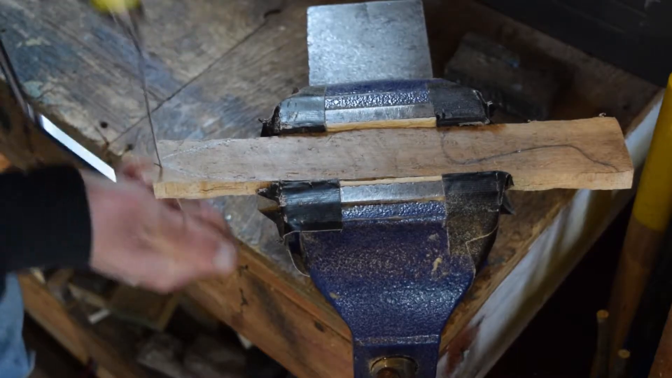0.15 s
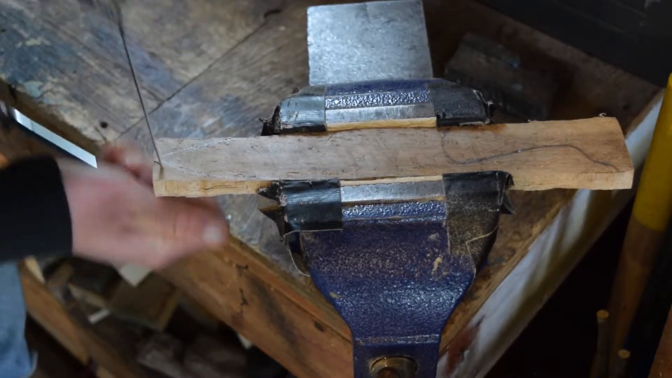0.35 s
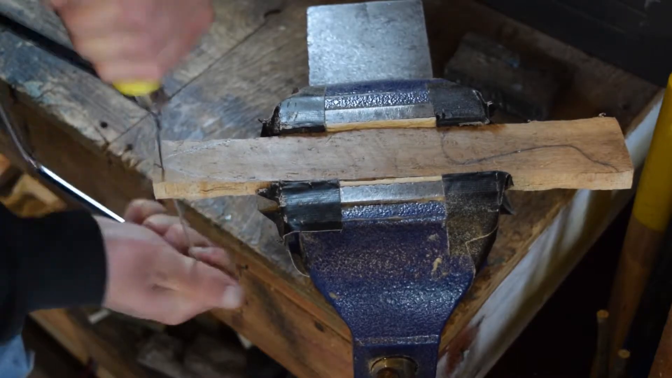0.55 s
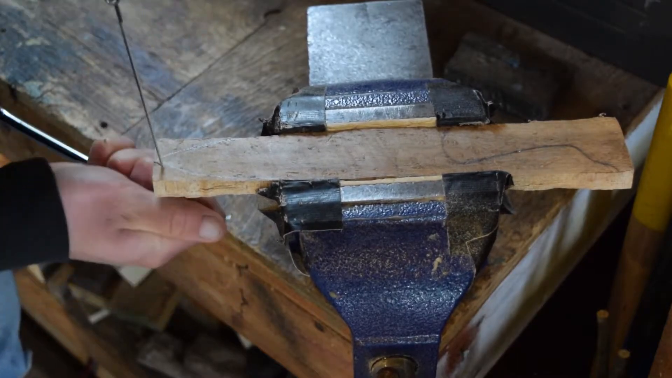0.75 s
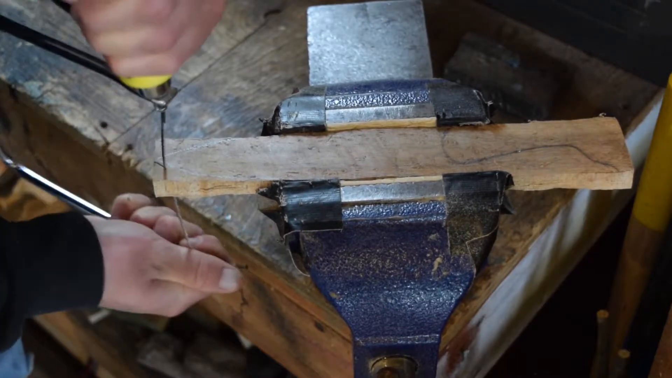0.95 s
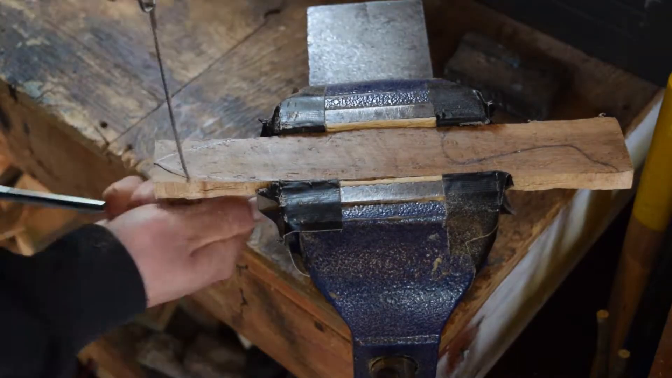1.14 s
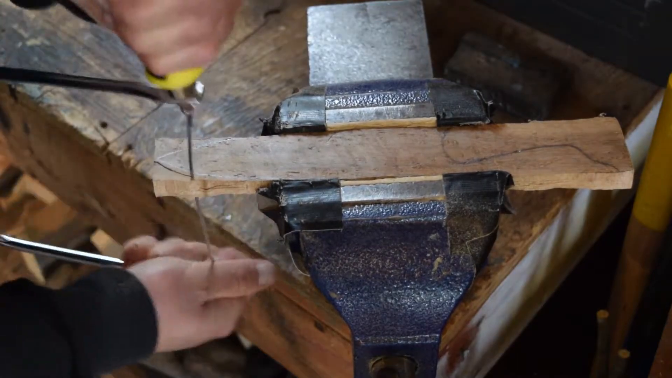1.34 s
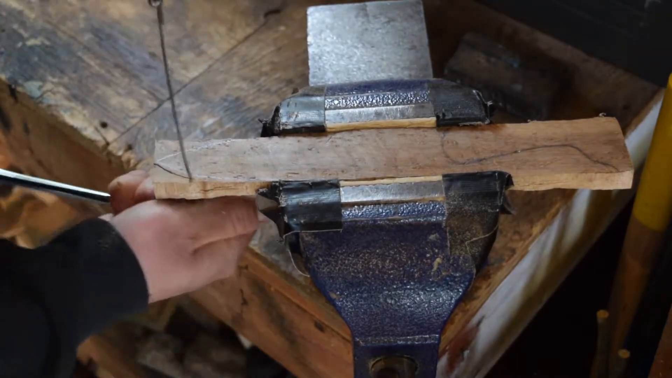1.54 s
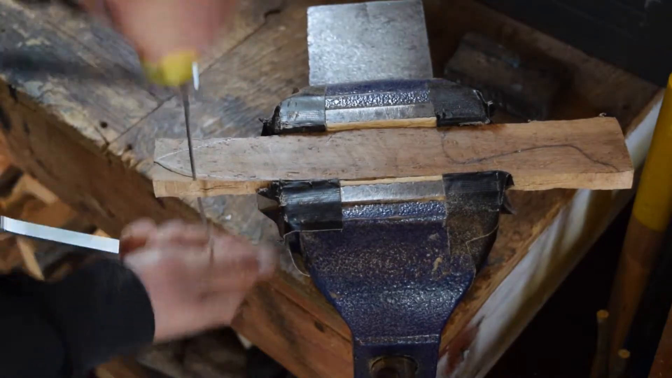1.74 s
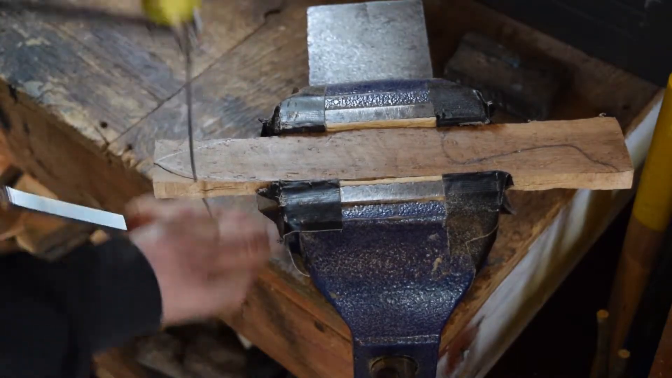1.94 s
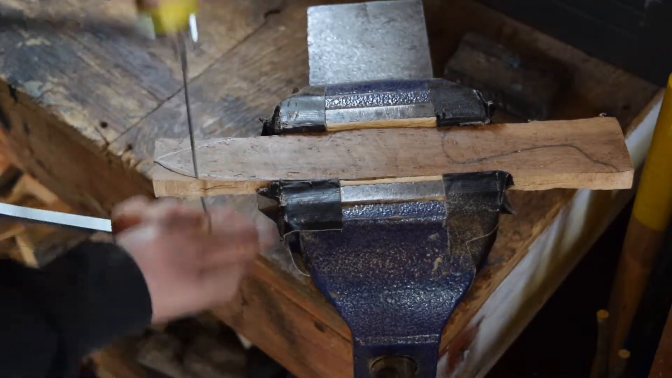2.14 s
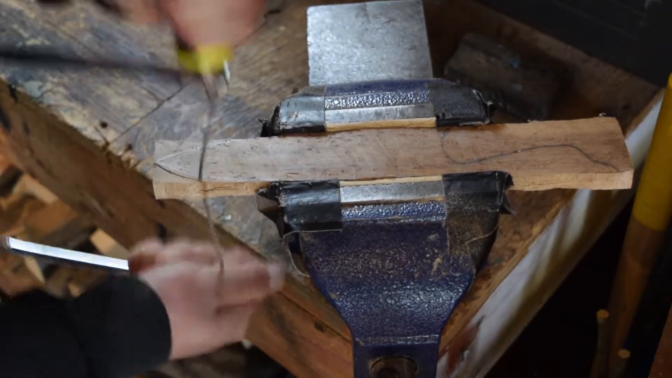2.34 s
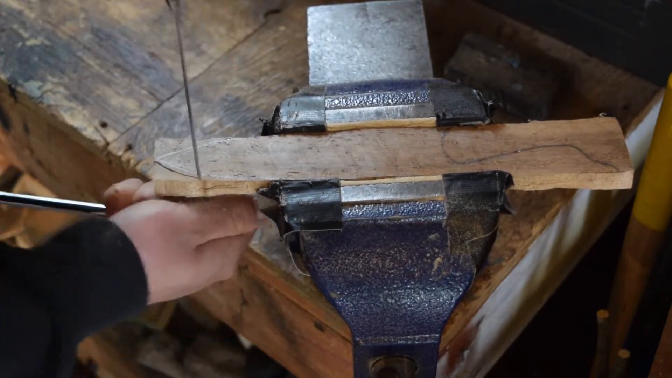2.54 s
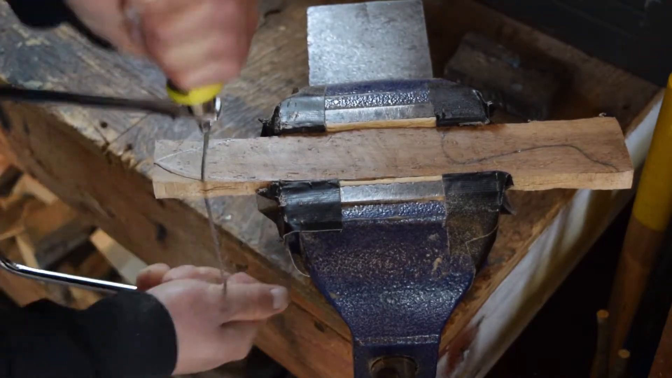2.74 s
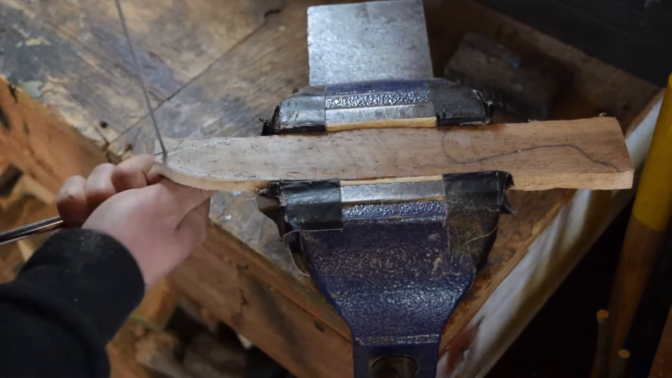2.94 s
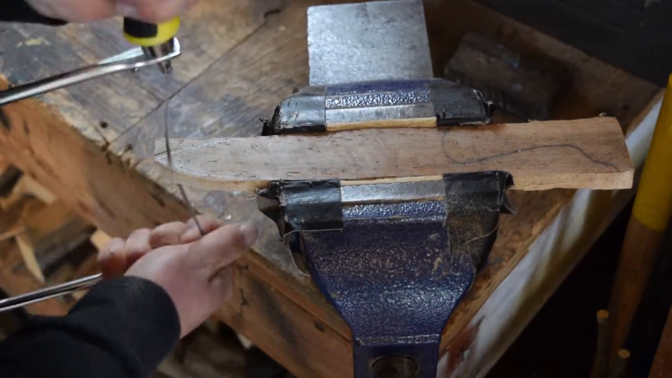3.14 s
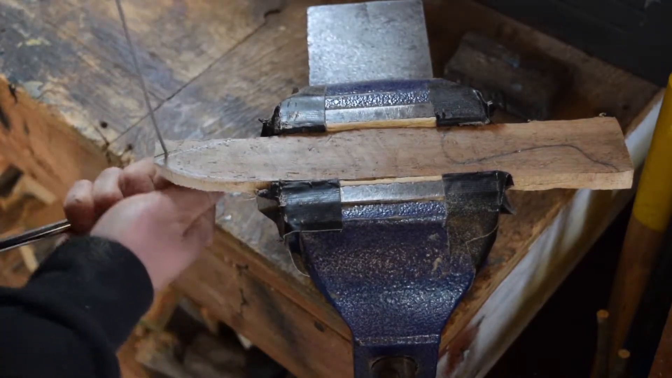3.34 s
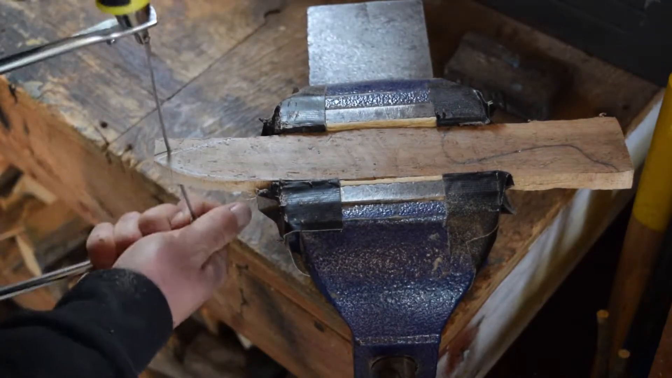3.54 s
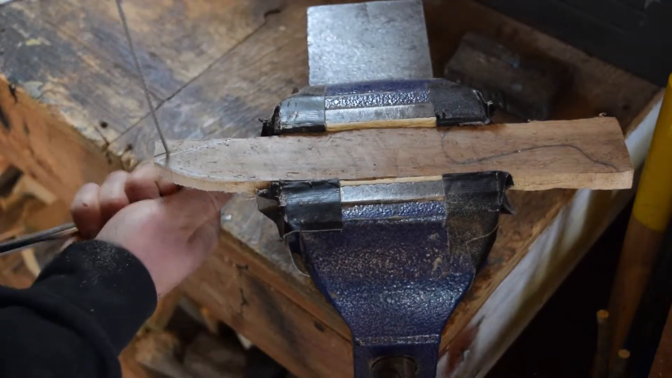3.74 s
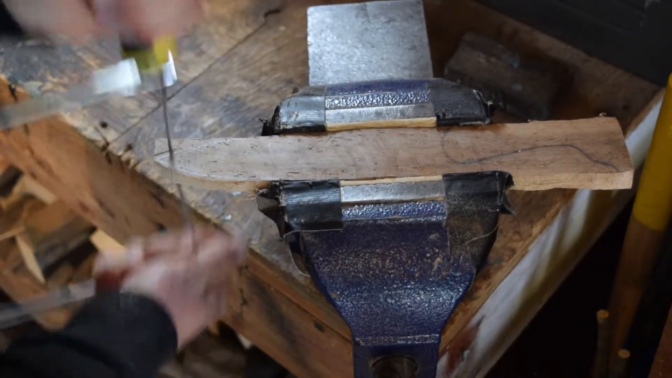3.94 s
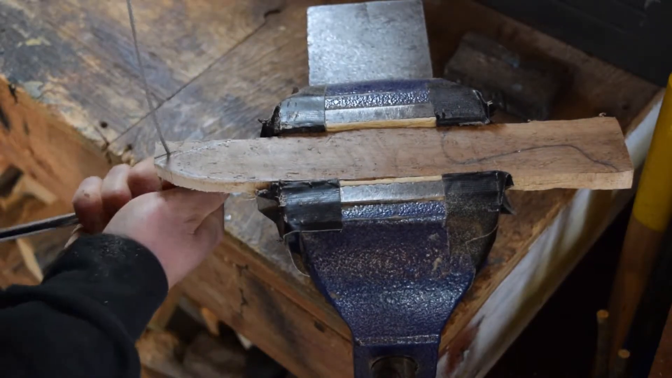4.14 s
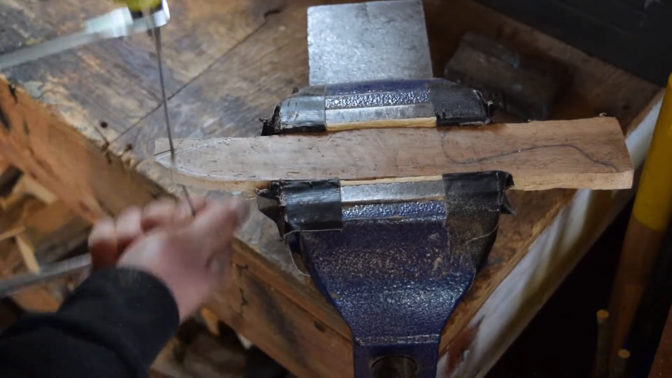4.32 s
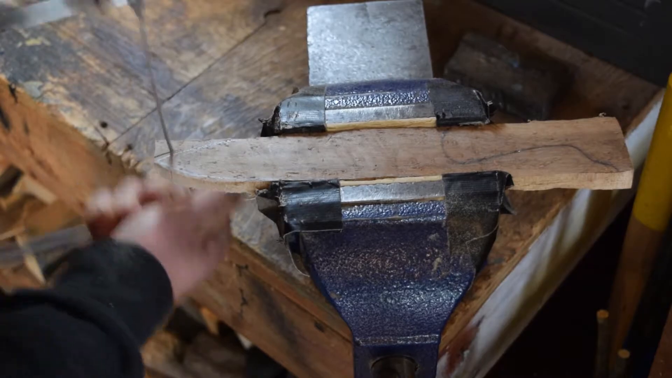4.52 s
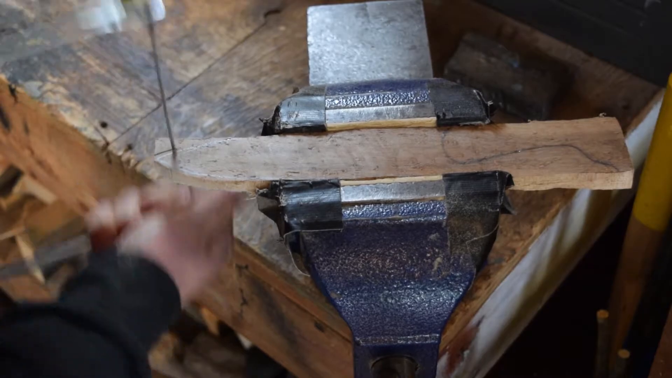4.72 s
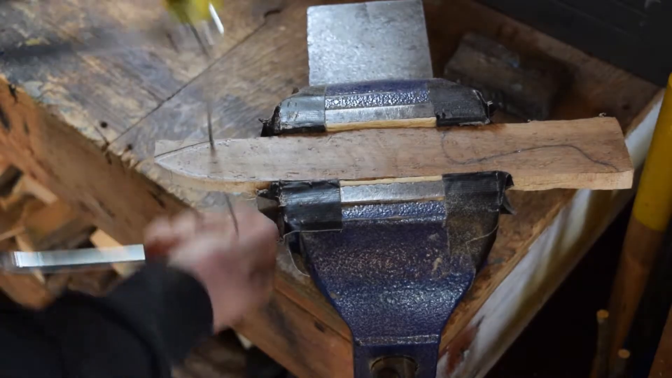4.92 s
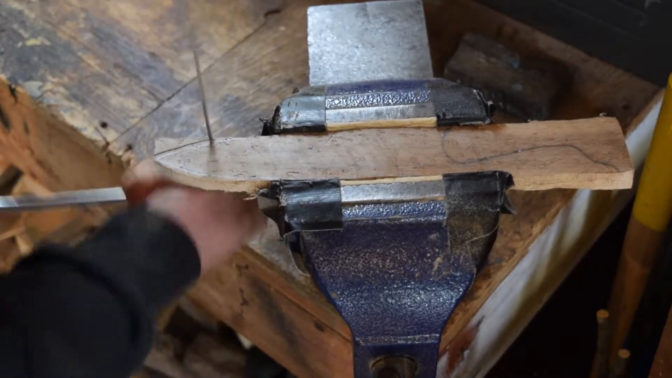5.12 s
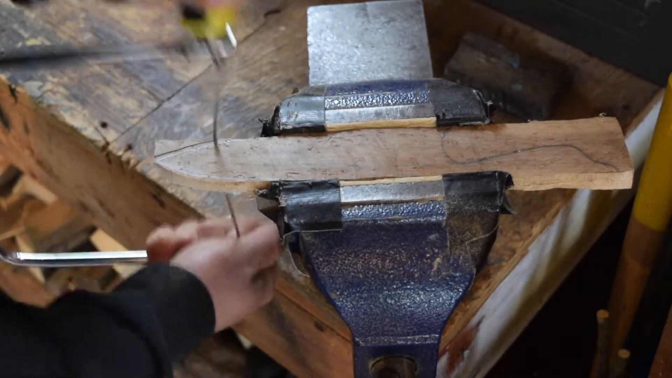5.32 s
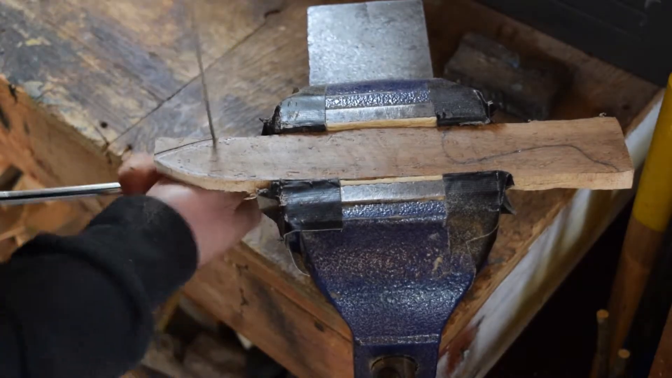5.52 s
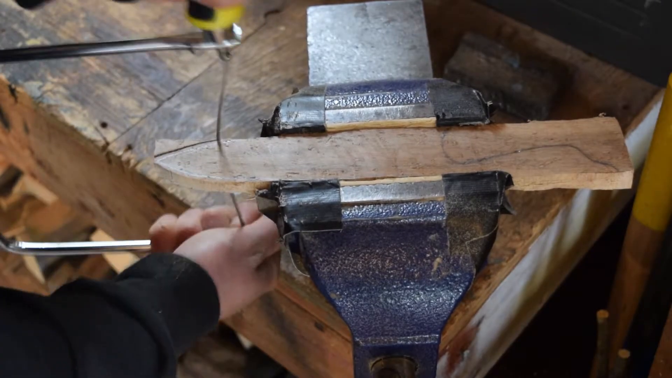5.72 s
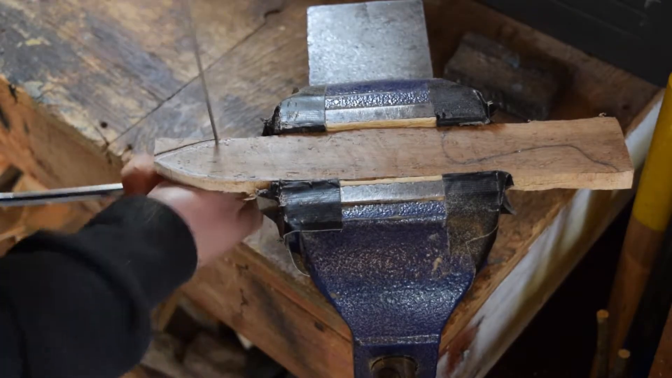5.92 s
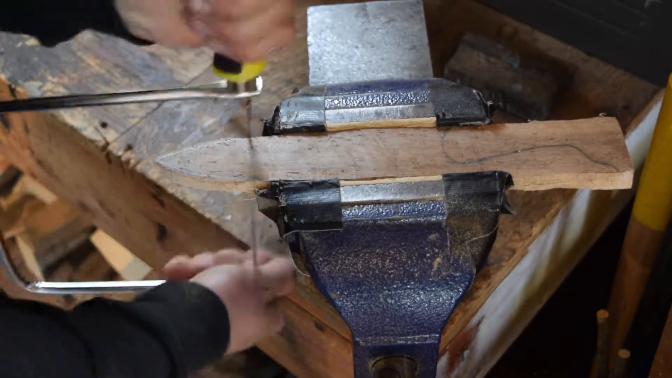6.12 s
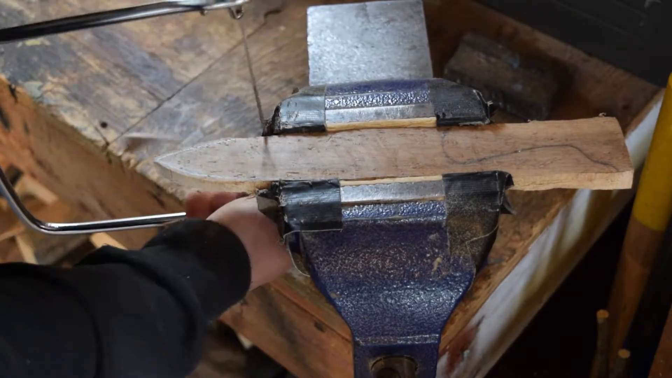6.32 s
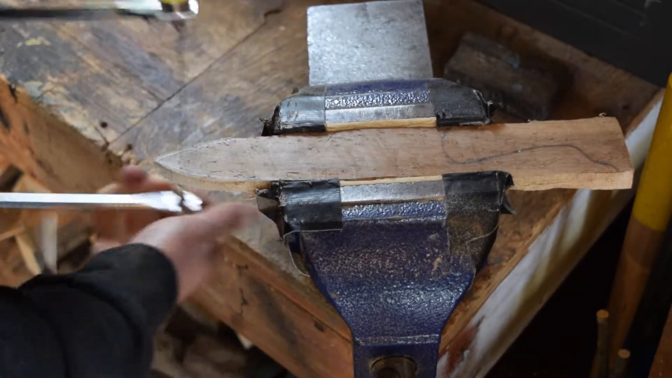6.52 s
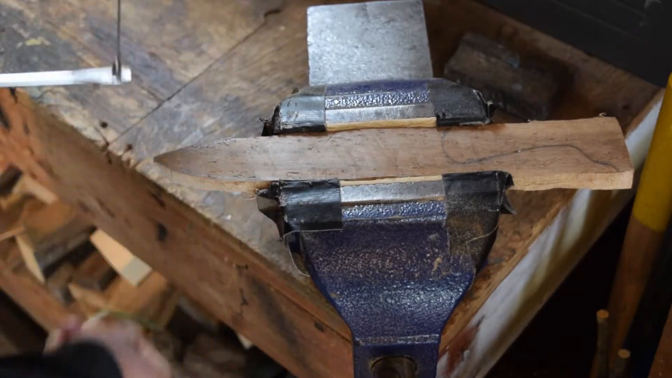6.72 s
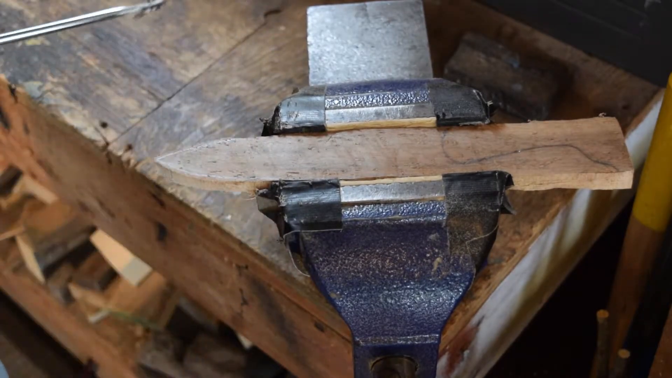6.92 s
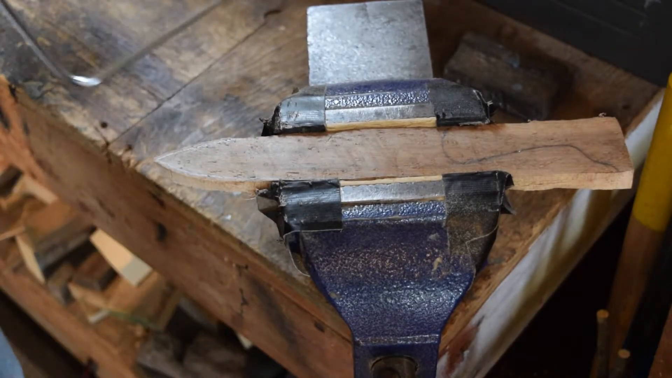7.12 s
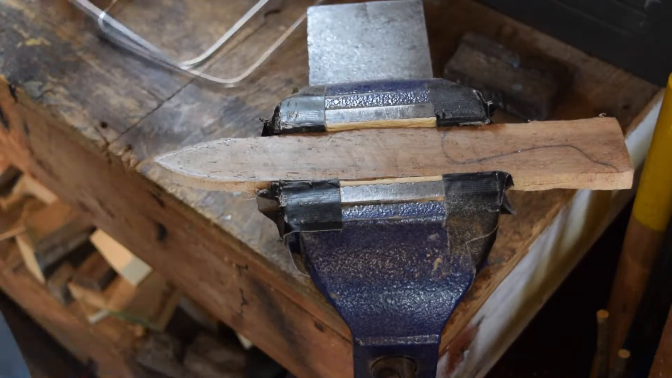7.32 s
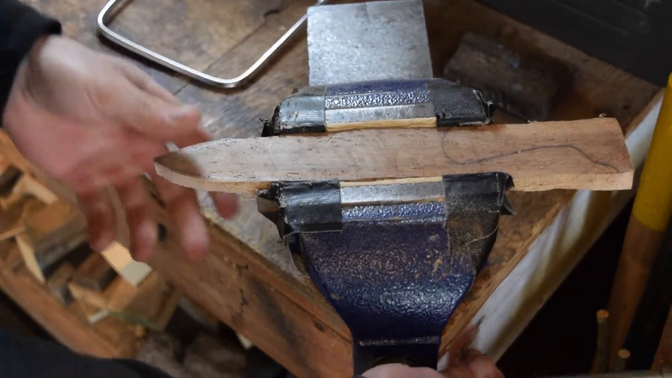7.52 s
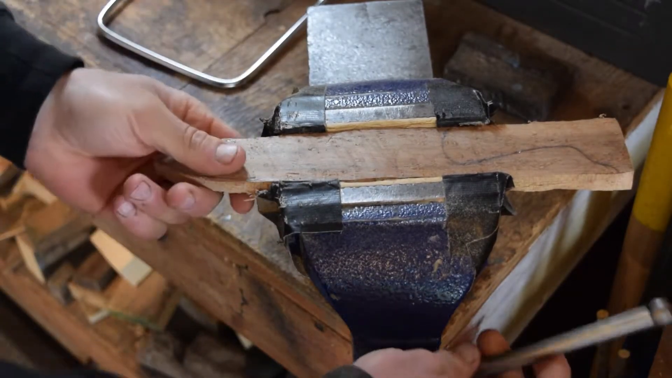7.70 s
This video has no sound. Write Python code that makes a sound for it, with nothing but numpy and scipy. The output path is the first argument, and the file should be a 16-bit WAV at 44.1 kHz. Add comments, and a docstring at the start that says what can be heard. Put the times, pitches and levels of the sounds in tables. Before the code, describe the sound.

Close, rapid back-and-forth sawing of a small wooden board, ending in a sharp crack, then light taps and dull vise knocks over grinding.

```python
"""In a small workshop a coping saw cuts the corner off a board held in a bench vise, close to the listener.
On every push and return the teeth pluck the wood: irregular impulses excite the resonances of board and saw,
tearing fibres add noise as hiss, and the bench rumbles below. The blade breaks out with a crack, an impulse
through the board's modes. Light taps follow, damped contacts; the vise is cranked open with dull knocks,
rings started by blows, over a noise-like grinding."""
import sys
import numpy as np
from scipy import signal
from scipy.fft import rfft, irfft
from scipy.io import wavfile

SR = 44100
rng = np.random.default_rng(int(sys.argv[2]) if len(sys.argv) > 2 else 0)


def master(y):
    """Save y as 16-bit WAV."""
    cut = np.clip(np.atleast_2d(y).T, -1, 1)
    pcm = np.round(cut * 32767)  # scale
    wavfile.write(sys.argv[1], SR, pcm.astype(np.int16))


N = 346626
T = np.arange(N) / SR


def amp(db):
    """Level: decibels become an amplitude ratio."""
    return 10 ** (np.asarray(db) / 20)


def unit(x):
    """Normalisation: scale to rms 1."""
    return x / np.sqrt(np.mean(x ** 2) + 1e-20)


def peak(x, db):
    """Normalisation: scale to a peak level [dB]."""
    return x * amp(db) / np.abs(x).max()


def add(out, start_s, x):
    """Superposition: mix x into out from the given time on."""
    i = int(round(start_s * SR))
    x, i = x[max(-i, 0):], max(i, 0)
    out[i:i + len(x)] += x[:max(len(out) - i, 0)]


def along(curve, s):
    """Linear interpolation: the values of a curve's columns at one moment."""
    times, *columns = np.transpose(curve)
    return [np.interp(s, times, column) for column in columns]


def band(x, lo_hz, hi_hz, order=3):
    """Band-pass filtering: keep the spectrum between two frequencies."""
    edges = [lo_hz, min(hi_hz, SR / 2 - 1000)]
    return signal.sosfilt(signal.butter(order, edges, "band", fs=SR, output="sos"), x)


def resonate(x, hz, width_hz):
    """Damped resonance: one mode, gain 1 at its centre; the narrower, the longer it rings."""
    return signal.lfilter(*signal.iirpeak(hz, hz / width_hz, fs=SR), x)


def ring(x, modes):
    """Modal superposition: a body's resonances add up, neighbours in opposite phase."""
    total = 0
    for k, (hz, width, db) in enumerate(modes):
        total = total + (-1) ** k * amp(db) * resonate(x, hz, width)
    return total


def contact(t60, grit, length_s=.4):
    """Impact excitation: a sharp push, and a noise burst of crunch that decays exponentially."""
    t = np.arange(int(length_s * SR)) / SR
    x = grit * rng.standard_normal(len(t)) * np.exp(-np.log(1000) * t / t60)
    x[0] += 1
    return x


# spectrum of the quiet workshop air: (frequency [Hz], relative spectral level [dB])
AIR_SPECTRUM = [(20, -14), (50, -0.5), (130, -6), (250, -4.5), (400, -7), (700, -8), (1200, -13.5),
                (4000, -15), (15500, -19)]
AIR_DB, HUM_DB = -64, -69  # rms levels


def air():
    """Spectrally shaped noise: faint room noise, with a narrow-band hum from a sharp resonance."""
    hz, db = np.transpose(AIR_SPECTRUM)
    f = np.arange(N // 2 + 1) * SR / N
    shape = amp(np.interp(np.log(f + 1), np.log(hz), db))
    hush = irfft(rfft(rng.standard_normal(N)) * shape, N)
    hum = resonate(resonate(rng.standard_normal(N), 296, 4.9), 296, 4.9)
    return amp(AIR_DB) * unit(hush) + amp(HUM_DB) * unit(hum)


ROOM_T60_S = .25


def room(x, gap_s=.004, treble=1.0):
    """Reverberation: dense reflections of a small, cluttered workshop, as exponentially decaying noise."""
    t = np.arange(SR // 2) / SR
    onset = np.clip(t / gap_s - 1, 0, 1)  # silence before the first reflections
    noise = rng.standard_normal(len(t)) * onset * np.exp(-np.log(1000) * t / ROOM_T60_S)
    response = band(noise, 120, 2200, order=2) + treble * band(noise, 2000, 7500, order=1)
    return signal.fftconvolve(x, unit(response) / np.sqrt(len(t)))[:N]


# resonances of the heavy bench under the vise: (frequency [Hz], width [Hz], level [dB])
BENCH_MODES = [(48, 16, -15), (83, 6.9, 0), (121.8, 26, -8.5), (181.6, 11, -5), (253, 31, -5)]


def bench(sound, follow=0.66, hold_s=0.02):
    """Forced vibration: noise follows the envelope of the work on the vise and drives the bench's modes."""
    keep = np.exp(-1 / (hold_s * SR))
    envelope = signal.lfilter([1 - keep], [1, -keep], np.abs(sound))
    force = envelope ** follow
    return unit(band(ring(force * rng.standard_normal(N), BENCH_MODES), 40, 280, order=2))


# the screw grinding in its thread: (time [s], rms level [dB])
SCREW = [(7.365, -87), (7.375, -50.5), (7.41, -52.5), (7.6, -60), (7.86, -50.5)]
# the loose vise screw knocks as it turns: (time [s], peak level [dB], ring [Hz], t60 [s])
KNOCKS = [(7.431, -24.5, 364, 0.064), (7.509, -23.5, 430, 0.02), (7.605, -25, 356.4, 0.062),
          (7.692, -23, 433, 0.027), (7.782, -27, 360, 0.037)]


def vise():
    """Friction and impact: the screw grinds, squeaks faintly and knocks, each knock with a light clack."""
    grind = amp(np.interp(T, *np.transpose(SCREW), left=-200))
    out = grind * unit(band(rng.standard_normal(N), 90, 600))
    # slow noise modulates a gliding tone
    squeak_hz = np.interp(T, [7.6, 7.72, 7.86], [6450, 6100, 6250])
    flutter = unit(band(rng.standard_normal(N), 5, 70, order=1))
    squeak = flutter * np.sin(2 * np.pi * np.cumsum(squeak_hz) / SR)
    out += amp(-75.5) * squeak * np.interp(T, [7.58, 7.63], [0, 1])
    for s, db, hz, t60 in KNOCKS:
        blow = band(contact(t60=0.077, grit=.05), 170, 780)
        width_hz = np.log(1000) / np.pi / t60
        add(out, s, peak(resonate(blow, hz, width_hz) + 0.11 * blow, db))
        clack = band(contact(t60=.04, grit=.4), 620, 1500, order=4)
        add(out, s, peak(clack, db - 17))
    return out


# light taps of the offcut and of the saw being laid down:
#   (time [s], peak level [dB], centre [Hz], width of the first of two resonances [Hz], t60 of the crunch [s])
TAPS = [(6.403, -38.5, 970, 1490, 0.051), (6.425, -51, 9000, 4000, 0.038), (6.759, -41, 900, 1100, .06),
        (6.836, -33, 2300, 1100, .004), (7.006, -38.5, 774, 600, 0.032), (7.082, -32.5, 600, 600, 0.023),
        (7.178, -40.5, 980, 1090, 0.021), (7.219, -52, 8720, 900, 0.087), (7.648, -44.5, 2440, 2500, 0.019),
        (7.799, -47, 3530, 4950, 0.013)]


def taps():
    """Damped impact: small contacts around the bench pass through two broad resonances."""
    out = np.zeros(N)
    for s, db, hz, width, t60 in TAPS:
        tap = resonate(contact(t60, grit=0.67), hz, width)
        add(out, s, peak(resonate(tap, hz, 2 * width), db))
    return out


# the board's ring as the blade breaks out: (frequency [Hz], width [Hz], level [dB])
CRACK_MODES = [(685, 80, -4), (836, 80, -12), (1173, 92, -1), (1760, 110, -6), (2010, 136, 2),
               (2560, 49, -4.5), (2620, 73.5, -2), (2940, 140, -3), (3174, 80, -3.5), (3820, 200, -4),
               (4240, 180, -11.5), (5110, 460, -12.5), (6230, 230, -18.5), (7170, 210, -13.5),
               (8570, 600, -25), (12000, 3000, -41)]
CRACK_S, CRACK_DB = 6.2385, -4.5  # time, peak level


def crack():
    """Impulsive release: the last fibres snap and the blade springs free, with a short rustling shiver."""
    out = np.zeros(N)
    snap = contact(t60=0.022, grit=0.131)
    add(snap, .0022, 2.9 * contact(t60=0.013, grit=0.31))  # a second, stronger break
    add(out, CRACK_S, peak(band(ring(snap, CRACK_MODES), 410, 16000, order=2), CRACK_DB))
    shiver = band(band(contact(t60=.16, grit=3), 500, 3600, order=1), 600, 9000, order=3)
    add(out, CRACK_S + .002, peak(shiver, -20))
    return out


def teeth(speed, rate_hz, jitter, scatter_db, tear_s, chatter_hz, chatter_db):
    """Irregular pulse train: teeth pluck in clumps as the frame chatters, and fibres tear after each."""
    passed = np.cumsum(speed) * rate_hz / SR
    chance = rng.standard_normal((400, 2))
    at = np.searchsorted(passed, np.cumsum(np.exp(jitter * chance[:, 0])))
    inside = at < len(speed)
    plucks = np.zeros(len(speed))
    plucks[at[inside]] = amp(scatter_db * chance[inside, 1])
    chatter = unit(band(rng.standard_normal(len(speed)), chatter_hz / 2, chatter_hz * 2, order=2))
    plucks *= amp(chatter_db * chatter)
    tearing = signal.lfilter([1], [1, -np.exp(-1 / (tear_s * SR))], plucks)
    return unit(plucks), unit(tearing * rng.standard_normal(len(speed)))


# mean resonances of the clamped board and the saw: (frequency [Hz], width [Hz], level [dB])
SAW_MODES = [(311.5, 28, -1.5), (363.2, 42.8, 2.5), (430.6, 65, -4.5), (511, 51, -8), (688.4, 60, -10),
             (841, 69, -13), (983, 91, -10.5), (1083, 88, -11), (1191, 83, -9.5), (1400, 123, -8.5),
             (1569, 78, -5), (1720, 96.6, -6), (1955, 95, -8.5), (2152, 37, -10), (2393, 160, -20.5),
             (3020, 250, -25.5), (3587, 340, -25.5), (4025, 260, -23), (4374, 240, -24), (5060, 250, -31),
             (6510, 240, -37), (6970, 250, -33), (7850, 76, -36), (8120, 170, -40.5), (9090, 390, -38.5),
             (9660, 68, -39), (12100, 1500, -41.5), (14000, 300, -50)]
# the blade jams for a moment: (time [s], length [s], extra board drive [dB], extra rasp drive [dB])
SNAGS = [(2.826, .006, 9, 7.5), (2.976, .035, 5.5, 8.5), (3.251, .0064, 7.5, 7), (3.446, .014, 2.5, 12),
         (4.328, .007, 6, 5)]
# hard spots in the grain, met at random: (length [s], extra board drive [dB], extra rasp drive [dB])
HARD_GRAIN = (.002, 1.5, 4)
# the rasp as the saw is steered round the curve: (time [s], level [dB], strongest ring [Hz])
RASP = [(0, 1.5, 1680), (.5, 1.5, 1560), (1.03, 2.5, 1600), (1.22, -7, 1650), (1.55, -7.5, 2350),
        (1.77, -7.5, 2400), (1.93, -3, 1400), (2.13, 1, 1420), (2.3, 2, 1750), (2.85, 3, 1620),
        (3.07, 0, 1430), (4.73, 0, 1500), (4.9, -4, 1890), (5.3, -5, 1910), (5.66, -9, 1660),
        (6.1, -6, 1750)]
# the treble along the cut:
#   (time [s], level [dB], strongest ring of the hiss [Hz], strongest ring of the sizzle [Hz])
TREBLE = [(.5, -1, 3300, 9100), (1.2, .5, 4400, 9400), (1.4, -2.5, 4100, 13200), (1.6, 2, 2500, 13100),
          (1.78, 1, 2400, 9000), (1.95, 1.5, 4800, 8800), (2.3, 5.5, 4400, 8700), (2.75, 7.5, 4600, 8600),
          (3.08, -2.5, 3000, 8750), (3.45, -4, 3000, 8700), (3.65, -1.5, 3000, 12900),
          (4.2, -4, 2600, 12800), (4.6, -1.5, 3050, 12600), (4.88, 3, 3350, 7250), (6.05, -.5, 3600, 7150)]
HISS_SHARE = .13  # of the treble's level change [dB] that reaches the hiss
# the board answers differently along the cut; its ring rises just before the corner breaks off:
#   (time [s], lowest ring [Hz], level [dB], level of the overtones [dB], mean strongest overtone [Hz])
BOARD = [(.15, 262, 0, 0, 690), (.55, 265, -1, -1, 1020), (1.05, 265, -1, 0, 1020),
         (1.25, 275, .5, -.5, 640), (1.65, 292, 0, -1, 1170), (2.35, 292, 0, -1, 1170),
         (2.7, 245, .5, -5.5, 1170), (3.07, 292, 0, 1.5, 1100), (3.47, 292, -2.5, 5, 680),
         (3.75, 292, 0, .5, 1100), (5.55, 292, 0, .5, 1050), (5.85, 440, -1, 0, 640),
         (6.03, 440, 2, -2, 640)]
WOOD_SPREAD = .04  # of the strongest overtone between strokes
TOOTH_HZ, TOOTH_SPREAD = 472, .08  # mean teeth per second at full speed, its spread between strokes


def stroke(start, fastest, stop, level_db, mix_db, catch):
    """Source and filter: tooth rate and force follow the saw's speed and drive board and blade modes."""
    t = start + np.arange(int(.32 * SR)) / SR
    rasp_db, rasp_hz = along(RASP, fastest)
    treble_db, hiss_hz, sizzle_hz = along(TREBLE, fastest)
    lowest_hz, board_db, wood_db, wood_hz = along(BOARD, fastest)
    tooth_hz = TOOTH_HZ * np.exp(TOOTH_SPREAD * rng.standard_normal())
    wood_hz *= np.exp(WOOD_SPREAD * rng.standard_normal())
    speed = np.sin(np.interp(t, [start, fastest, stop], [0, np.pi / 2, np.pi])).clip(0)
    plucks, fibres = teeth(speed ** .6, tooth_hz, jitter=.15, scatter_db=2.8, tear_s=0.0019,
                           chatter_hz=131, chatter_db=2.0)
    hard_spots = [(s, *HARD_GRAIN) for s in rng.uniform(start, stop, size=3)]
    when, length, heavy_db, sharp_db = np.transpose([catch, *SNAGS, *hard_spots])
    caught = np.exp(-((t[:, None] - when) / length) ** 2)
    # the teeth cut deeper with speed, and the hand eases off before it stops
    depth = speed ** 1.85
    ease = amp(np.interp((t - start) / (stop - start), [.64, .84], [0, -11]))
    force = depth * ease + 0.0087 * np.exp(-np.maximum(t - stop, 0) / .06)
    heavy = (plucks + 0.45 * fibres) * force ** .98 * amp(caught @ heavy_db)
    sharp = (plucks + 0.66 * fibres) * force * amp(caught @ sharp_db)
    rustle = .25 * plucks + fibres + .45 * rng.standard_normal(len(t))
    fine = rustle * force ** 0.91 * amp(.15 * caught @ sharp_db)
    # grip, depth of the cut and free length of the blade shift the resonances a little on every stroke
    shifts = rng.standard_normal((len(SAW_MODES), 2))
    modes = [(hz * (1 + 0.015 * a), width, db + 1.4 * b)
             for (hz, width, db), (a, b) in zip(SAW_MODES, shifts)]
    low, mid = ring(heavy, modes), ring(sharp, modes)
    # tearing fibres and the blade rubbing in its slot also radiate straight from the cut
    direct = band(np.roll(fine, 23), 1700, 9500, order=1)
    high = ring(fine, modes) + amp(-35.5) * direct
    # at full speed the tooth rate itself sings through the board
    board = band(low + 0.15 * resonate(low * speed ** 6, tooth_hz, 66), lowest_hz, 608, order=5)
    wood = band(mid + 0.55 * resonate(mid, wood_hz, 140), 609, 1211, order=4)
    rasp = band(mid + 5.3 * resonate(mid, rasp_hz, 350), 1254, 2600, order=4)
    hiss = band(high + 1.1 * resonate(high, hiss_hz, 450), 2270, 6700, order=4)
    sizzle = band(high + 1.0 * resonate(high, sizzle_hz, 800), 5800, 19000, order=4)
    changes_db = [board_db, wood_db, rasp_db, HISS_SHARE * treble_db, treble_db]
    gains = amp(level_db + np.array(mix_db) + changes_db)
    parts = zip((board, wood, rasp, hiss, sizzle), gains)
    # the rms refers to the length of the stroke, not of the longer window
    return sum(unit(x) * gain for x, gain in parts) * np.sqrt((stop - start) * SR / len(t))


# cutting strokes:
#   (start [s], teeth bite [s], fastest [s], stop [s], level before the mix [dB], bite [dB])
PUSHES = [(.078, .134, .143, .229, -24, 3), (.413, .452, .512, .6, -25.5, 6),
          (.78, .816, .851, .937, -23.5, 11), (1.157, 1.196, 1.205, 1.312, -23, 9),
          (1.531, 1.563, 1.59, 1.685, -24, 9), (1.885, 1.936, 1.952, 2.036, -23.5, 5),
          (2.259, 2.295, 2.305, 2.407, -24, 6), (2.624, 2.651, 2.695, 2.787, -23.5, 9),
          (2.967, 3.012, 3.07, 3.137, -23.5, 4), (3.394, 3.411, 3.451, 3.524, -21, 16),
          (3.714, 3.76, 3.815, 3.887, -23.5, 4), (4.139, 4.164, 4.199, 4.283, -23.5, 14),
          (4.477, 4.497, 4.537, 4.641, -23.5, 13), (4.837, 4.87, 4.883, 4.99, -23.5, 8),
          (5.221, 5.253, 5.269, 5.381, -24, 11), (5.607, 5.651, 5.659, 5.766, -25, 13),
          (5.986, 6.033, 6.036, 6.102, -23.5, 7)]
# lighter strokes back: (start [s], stop [s], level before the mix [dB])
RETURNS = [(-.09, .05, -28), (.262, .422, -30), (.592, .775, -30.5), (.955, 1.128, -31),
           (1.318, 1.502, -31.5), (1.684, 1.862, -31), (2.058, 2.227, -34.5), (2.418, 2.585, -32.5),
           (2.784, 2.972, -33), (3.162, 3.33, -28.5), (3.55, 3.7, -33.5), (3.888, 4.072, -28),
           (4.268, 4.447, -29.5), (4.65, 4.808, -30), (5.02, 5.193, -31.5), (5.398, 5.569, -32.5),
           (5.78, 5.955, -34), (6.18, 6.215, -45)]
# balance of a stroke: (board [dB], wood overtones [dB], blade rasp [dB], hiss [dB], sizzle [dB])
PUSH_MIX = (0, -5.5, -3, -12.3, -19)
RETURN_MIX = (0, -6, -1.5, -14.2, -22.5)
# a return judders as it slows: (length [s], extra board drive [dB], extra rasp drive [dB])
JUDDER = (.014, 4.5, 0)
# the teeth click into the cut as the saw turns round: (time [s], peak level [dB])
TURNS = [(1.161, -26), (1.545, -28), (1.905, -28.5), (2.955, -34), (3.329, -30), (3.408, -23.5),
         (4.156, -19.5), (4.846, -22.5), (5.235, -26.5), (5.626, -32)]
RETURN_FASTEST, JUDDER_AT = .45, .65  # shares of the return stroke
BITE_S, BITE_RASP_SHARE = .005, .65  # length of a bite; share of its dB that reaches the rasp


def saw():
    """Reciprocating excitation: pushes that bite, returns that judder, and clicks at the turns."""
    out = np.zeros(N)
    for start, bite, fastest, stop, db, bite_db in PUSHES:
        catch = (bite, BITE_S, bite_db, BITE_RASP_SHARE * bite_db)
        add(out, start, stroke(start, fastest, stop, db, PUSH_MIX, catch))
    for start, stop, db in RETURNS:
        fastest, judder = start + (stop - start) * np.array([RETURN_FASTEST, JUDDER_AT])
        add(out, start, stroke(start, fastest, stop, db, RETURN_MIX, (judder, *JUDDER)))
    for s, db in TURNS:
        click = ring(contact(t60=0.024, grit=0.32), SAW_MODES)
        add(out, s, peak(band(click, 320, 15000), db))
    return out


def scene():
    """Direct and reverberant sound: saw and vise are close; the taps, further off, feed the room more."""
    sawing, snap, tapping, cranking = saw(), crack(), taps(), vise()
    rumble = amp(-46) * bench(sawing) + amp(-68.5) * bench(cranking)
    echoes = room(amp(-17) * (sawing + snap) + amp(-13) * tapping + amp(-17.5) * cranking)
    return (sawing + snap + tapping + cranking + rumble + echoes + air())[None]


TOP_HZ = 15800


def record(dry):
    """Clipping and band limiting: full scale limits the peaks, then a steep low-pass cuts the top."""
    low_pass = signal.ellip(10, .2, 80, TOP_HZ, fs=SR, output="sos")
    return signal.sosfilt(low_pass, np.clip(dry, -1, 1))


dry = scene()
out = record(dry)
master(out)
```